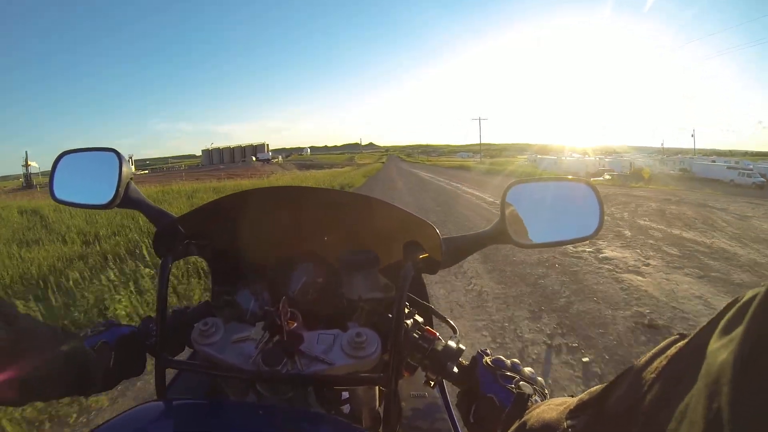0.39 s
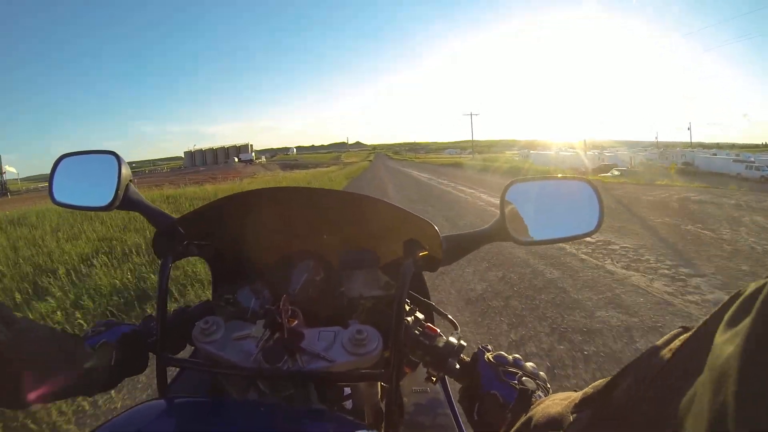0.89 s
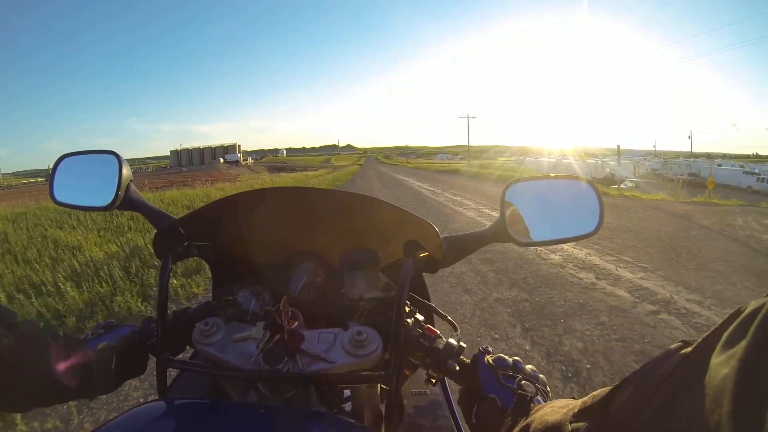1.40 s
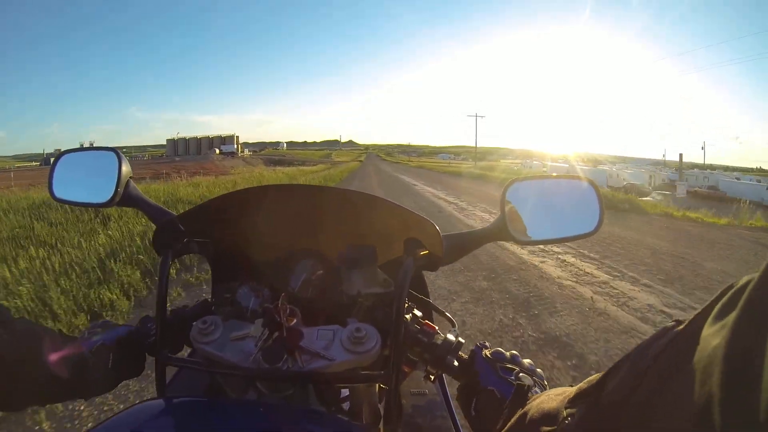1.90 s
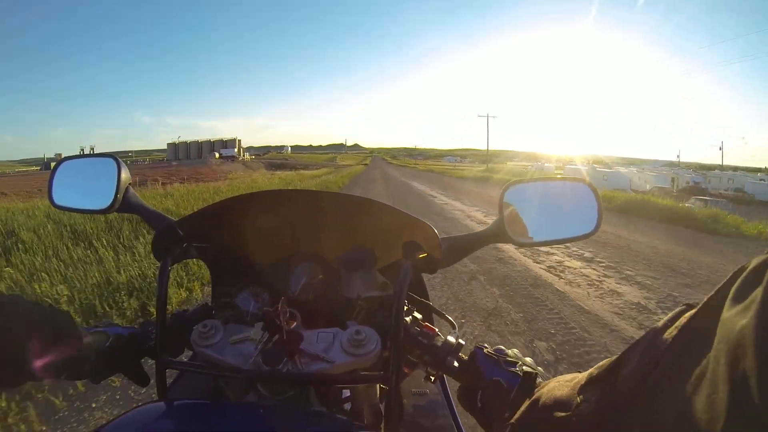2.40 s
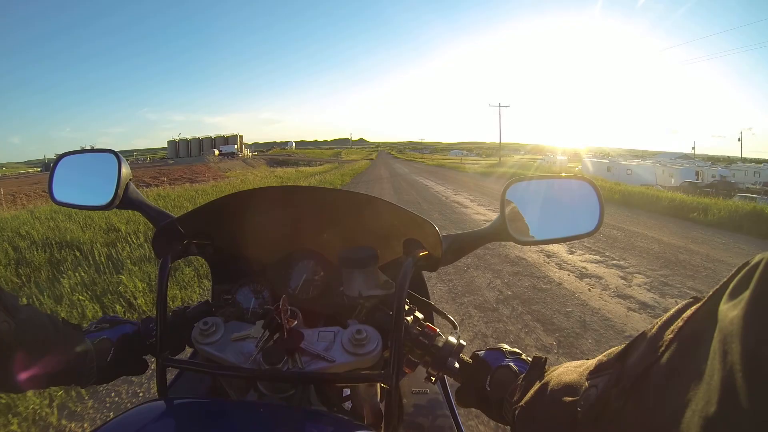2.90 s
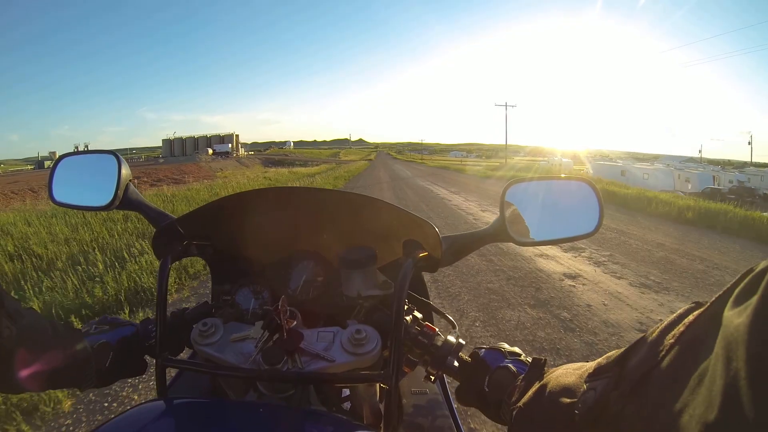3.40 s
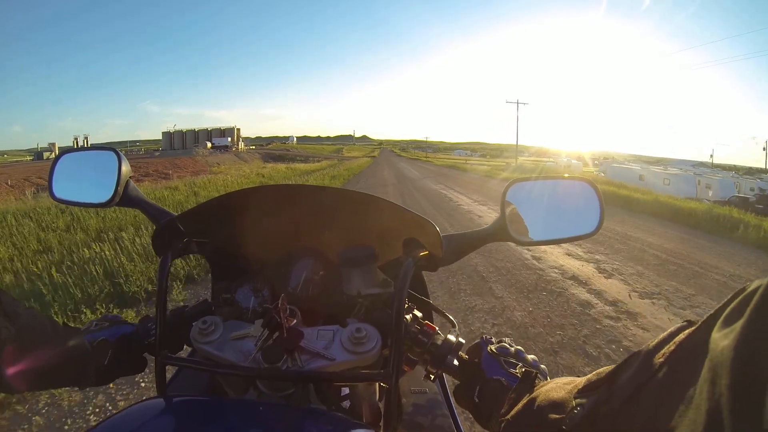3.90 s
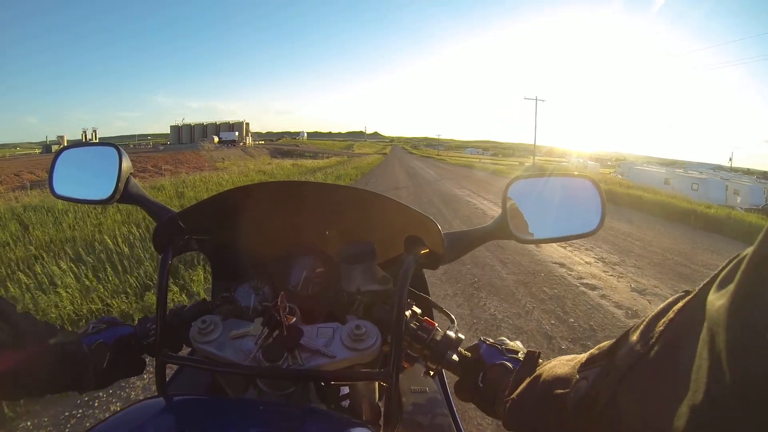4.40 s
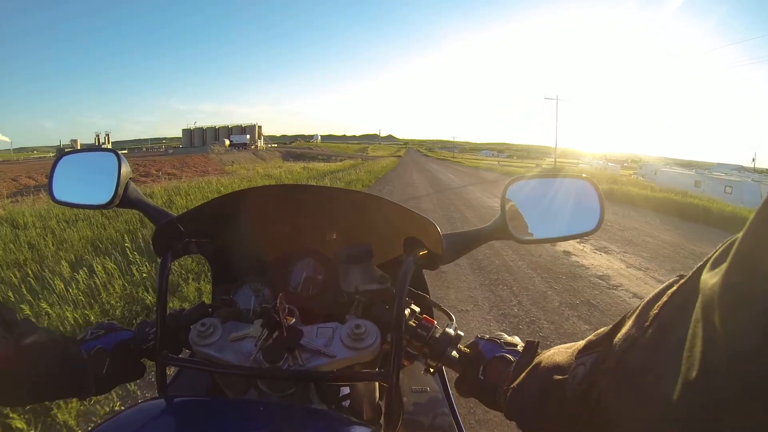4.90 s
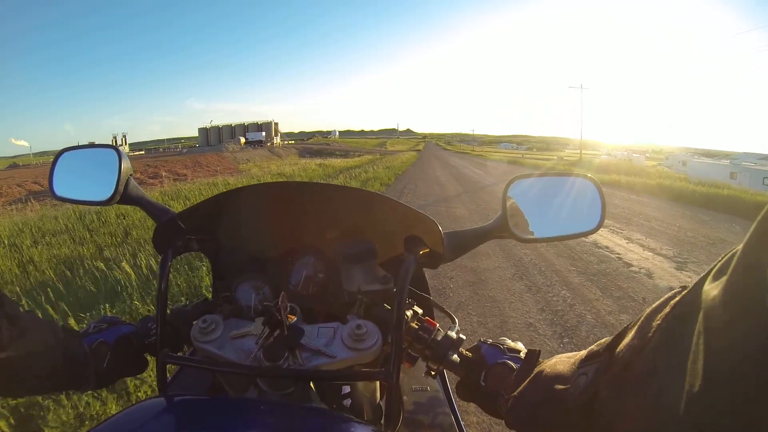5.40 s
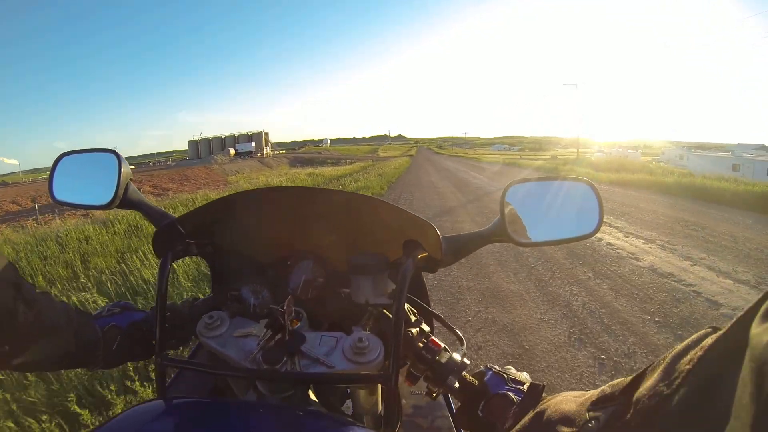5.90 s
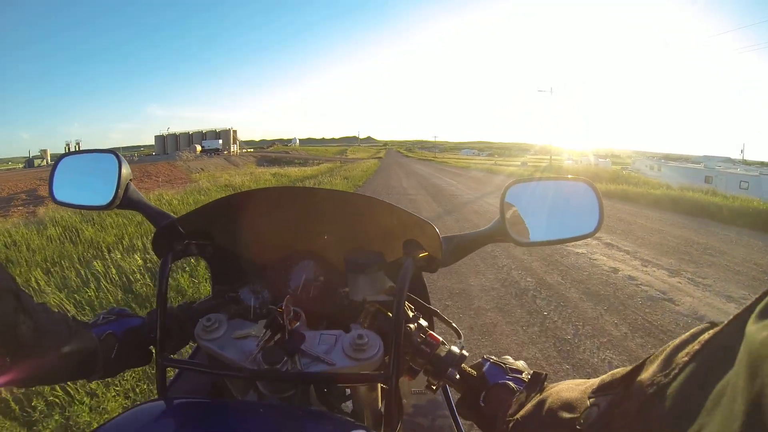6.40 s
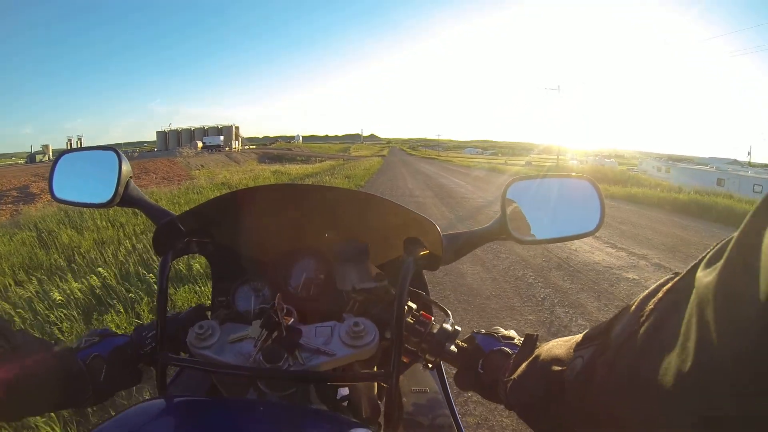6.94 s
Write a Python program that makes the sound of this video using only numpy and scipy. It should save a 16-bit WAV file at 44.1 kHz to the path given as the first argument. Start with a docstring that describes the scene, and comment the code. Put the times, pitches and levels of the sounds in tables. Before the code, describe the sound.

A motorcycle rolls slowly on gravel, its low engine hum sinking to a deep idle amid muffled wind rumble, crunching stones and a sharp late clatter.

```python
"""Motorcycle slowing on gravel

A four-cylinder motorcycle rolls slowly along a gravel road and drops to idle, heard inside a closed case on the rider.
The exhaust hums as harmonics of the firing rate; the casing whirs as filtered clatter pulsing with the firing.
Wind is filtered noise: a low rumble, with gusts of buffeting above it; tyres roar as noise roughened by clicks.
Bursts of dense treble clicks are crunching stones and a few short ticks; single stones snap or knock the frame
as struck resonances."""
import sys
import numpy as np
from scipy import signal
from scipy.fft import rfft, irfft
from scipy.io import wavfile
from scipy.ndimage import uniform_filter1d, minimum_filter1d

SR = 44100
rng = np.random.default_rng(int(sys.argv[2]) if len(sys.argv) > 2 else 0)


def file_out(sig):
    """Save sig as 16-bit WAV at sys.argv[1]."""
    # one column per channel
    cols = np.atleast_2d(sig).T
    # limit, then scale
    lim = np.clip(cols, -1, 1)
    pcm = np.round(lim * 32767).astype(np.int16)
    wavfile.write(sys.argv[1], SR, pcm)


def gain_from_db(level_db):
    """Turn a decibel level (scalar or array-like) into a linear amplitude factor."""
    decades = np.asarray(level_db, float) / 20
    return 10 ** decades


N = 310888
T = np.arange(N) / SR

# Resonances of the stones. Each row: frequency in Hz, width in Hz, relative level in dB.
STONE_BODY = [(1613, 420, 5.5), (2893, 1070, 3.5), (910, 100, 4)]
# Bright spectrum of the stones. Each row: frequency in Hz, relative level in dB.
STONE_TREBLE = [(2000, -21), (3200, 1.5), (4000, -3), (5000, -9.5), (5700, -15), (10200, -19.5),
                (11800, -24), (13200, -27.5), (15000, -32)]


def level(x, db):
    """Scale to an rms level."""
    return x * gain_from_db(db) / np.sqrt(np.mean(x ** 2))


def curves(table):
    """Columns of a time table, one value per sample."""
    s, *columns = np.transpose(table)
    return [np.interp(T, s, column) for column in columns]


def colour(x, points):
    """Causal minimum-phase filter through (Hz, dB) points, built by folding the cepstrum."""
    hz, db = np.transpose(points)
    half = 2048
    bins_hz = np.arange(half + 1) * SR / (2 * half) + 1
    log_gain = np.interp(np.log(bins_hz), np.log(hz), db) * np.log(10) / 20
    cepstrum = irfft(log_gain)
    cepstrum[1:half] *= 2
    cepstrum[half + 1:] = 0
    impulse = irfft(np.exp(rfft(cepstrum)))
    return signal.fftconvolve(x, impulse)[:N]


def ring(x, modes):
    """Sum of resonances, each (Hz, width Hz, dB)."""
    out = 0
    for hz, width_hz, db in modes:
        b, a = signal.iirpeak(hz, hz / width_hz, fs=SR)
        out = out + gain_from_db(db) * signal.lfilter(b, a, x)
    return out


def lowpass(x, hz, order):
    """Butterworth low-pass."""
    return signal.sosfilt(signal.butter(order, hz, fs=SR, output="sos"), x)


def walk(rate_hz):
    """Random levels held 1 / rate_hz seconds and slewed twice; spread near 1."""
    hold = int(SR / rate_hz)
    held = rng.standard_normal(size=1000)[np.arange(N) // hold]
    return 1.3 * uniform_filter1d(uniform_filter1d(held, hold), hold)


def swells(centre_s, db, length_ms):
    """Rms envelope of bell-shaped bursts that rise faster than they fall; length is taken at half power."""
    rise_share = 0.35  # of the length
    power = np.zeros(N)
    for t, d, w in zip(centre_s, db, length_ms):
        span = slice(max(int((t - w / 500) * SR), 0), int((t + w / 350) * SR))
        late_ms = (T[span] - t) * 1000 + (0.5 - rise_share) * w  # after the peak
        half_ms = w * np.where(late_ms < 0, rise_share, 1 - rise_share)
        power[span] += gain_from_db(2 * d) * 0.5 ** ((late_ms / half_ms) ** 2)
    return np.sqrt(power)


def grains(per_s, spread_db):
    """Random clicks, many small and a few large, at 0 dB rms."""
    hit, rank, sign = rng.random(size=(3, N))
    size = gain_from_db(-spread_db * np.log(rank + 0.0038))
    clicks = (hit < per_s / SR) * size * np.sign(sign - 0.5)
    return level(clicks, 0)


def blows(table, modes, soft_hz):
    """One click per row: the first mode rings up to the peak level, the other modes vary with the blow."""
    s, first_db, others_over_db = np.transpose(table)
    unit = np.zeros(N)
    unit[0] = 1
    out = 0
    for group, peak_db in ((modes[:1], first_db), (modes[1:], first_db + others_over_db)):
        unit_peak = np.max(lowpass(ring(unit, group), soft_hz, order=4))
        click = np.zeros(N)
        click[(s * SR).astype(int)] = gain_from_db(peak_db) / unit_peak
        out = out + lowpass(ring(click, group), soft_hz, order=4)
    return out


def engine():
    """Firing hum with harmonics and a faint gear tone; timing and strength waver slowly, over several firings."""
    # Revs sinking to idle. Each row: time in seconds, firing rate in Hz, hum level in dB.
    revs = [(0, 62.4, -24.5), (.15, 62.27, -21), (.6, 61.2, -17), (.88, 60.22, -21.5), (1.1, 59.95, -18.5),
            (1.4, 58.92, -19), (2.12, 57.8, -18), (2.62, 53.5, -20.5), (2.95, 48.15, -15),
            (3.25, 44.23, -13.5), (3.6, 43.7, -15), (3.85, 42.54, -14), (4.2, 42.92, -12),
            (4.45, 42.85, -15), (4.75, 42.4, -12), (5.0, 42.2, -9.5), (5.4, 42.5, -10), (5.9, 42.02, -10.5),
            (6.2, 42.4, -10.5), (7.05, 42.5, -9.5)]
    # Weak orders from uneven cylinders. Each row: multiple of the firing rate, level in dB relative to the hum.
    uneven = [(.5, -25), (.75, -26), (1.5, -27), (1.75, -27)]
    # Overtone level out of the exhaust. Each row: frequency in Hz, level in dB.
    overtone_pipe = [(84, -29.5), (100, -32), (118, -25.5), (127, -28.5), (145, -36), (175, -36),
                     (210, -45), (255, -43), (297, -46), (340, -55), (440, -60)]
    # Phase lags behind the hum. One value in radians for each of overtones 2 to 7.
    overtone_lags = [1.2, 3.1, 2.4, .9, 1.8, 2.5]
    lag_drift_rad = 0.55
    gear_teeth, gear_db = 25, -37  # teeth per firing; relative to the hum
    firing_hz, hum_db = curves(revs)
    pipe_hz, pipe_db = np.transpose(overtone_pipe)
    shaft = 2 * np.pi * np.cumsum(firing_hz) / SR
    phase = shaft + 0.08 * walk(13)
    hum = gain_from_db(hum_db + 0.9 * walk(12)) * np.cos(phase)
    for k, mean_lag in enumerate(overtone_lags, start=2):
        lag = mean_lag + lag_drift_rad * walk(8)
        overtone_db = np.interp(k * firing_hz, pipe_hz, pipe_db) + 3.3 * walk(8.2)
        hum += gain_from_db(overtone_db) * np.cos(k * phase - lag)
    for multiple, db in uneven:
        hum += gain_from_db(hum_db + db + 2.8 * walk(6)) * np.sin(multiple * phase)
    gear_phase = gear_teeth * shaft + 2.2 * walk(30)
    hum += gain_from_db(hum_db + gear_db + 2.5 * walk(9)) * np.sin(gear_phase)
    effort_db = hum_db - np.mean(hum_db)
    return np.sqrt(2) * hum, phase, effort_db


def whir(phase, loose_db, effort_db):
    """Valves and chain: clatter pulsing with each firing, harder under a deep hum and over loose stones."""
    # Casing spectrum. Each row: frequency in Hz, relative level in dB.
    casing_spectrum = [(900, -23), (1080, -7), (1350, -6), (1650, -2), (1910, 1), (2200, -2.5), (2500, -4),
                       (3200, -12), (3900, -17.5), (4600, -30.5), (5150, -24), (5700, -30), (9000, -39),
                       (11000, -62), (13000, -69.5), (15000, -81.5)]
    db = -38 + 0.41 * loose_db + 0.19 * effort_db
    pulse = 1 + 0.1 * np.cos(phase) + 0.11 * np.cos(phase / 2) + 0.081 * np.cos(2 * phase)
    clatter = rng.standard_normal(N) + 0.5 * grains(per_s=1500, spread_db=2)
    return gain_from_db(db + walk(14)) * level(colour(clatter * pulse, casing_spectrum), 0.19)


def wind(air_db):
    """Turbulence on the case: a low rumble, with buffeting and flutter above it that swell in gusts."""
    # Swells. Each row: centre in seconds, relative level in dB, length in ms, flutter in dB over that level.
    gusts = [(0.123, -19.5, 14, -0.5), (0.376, -20.5, 68, -6), (0.5, -25, 53, -2), (0.61, -20, 42, -4.5),
             (0.739, -21, 35, 0), (0.841, -22.5, 40, 2), (0.99, -17.5, 20, -4.5), (1.09, -26, 51, 0),
             (1.198, -17.5, 62, -8), (1.332, -19, 20, 0), (1.421, -15, 8, -7), (1.573, -18, 43, -2.5),
             (1.681, -19, 12.1, -5), (1.914, -19, 130, -11), (2.126, -18, 26, -22), (2.249, -18, 26, -0.5),
             (2.336, -11.5, 46, -1.5), (2.38, -14.5, 39, -6.5), (2.46, -18.5, 63, -7.5),
             (2.77, -23.5, 99, -10.5), (2.927, -18, 63, -14), (3.27, -24, 140, -9), (3.446, -33, 16, -13),
             (3.675, -23, 32, -2.5), (4.559, -22.5, 57, -19), (4.642, -23.5, 36, -15),
             (5.221, -19.5, 18, -18), (6.172, -26, 50.7, -2.5)]
    # Buffeting spectrum. Each row: frequency in Hz, relative level in dB.
    buffet_spectrum = [(15, -16), (25, -0.5), (60, -2.5), (118, -3.5), (160, -7.5), (220, -8.5),
                       (300, -10.5), (400, -17.5), (800, -24.5), (2000, -42), (5000, -76.5), (15000, -120)]
    # Flutter spectrum. Each row: frequency in Hz, relative level in dB.
    flutter_spectrum = [(130, -16), (190, -5), (300, 1), (420, 0.5), (560, -4), (800, -10.5), (1800, -21),
                        (4000, -42), (15000, -110)]
    eddy_fade_db_per_s, rumble_fade_db_per_s = 0.7, 0.2  # small eddies die faster as the bike slows
    flutter_per_airflow = 1.68  # dB per dB: flutter dies fast as the air slows
    s, gust_db, ms, flutter_over_db = np.transpose(gusts)
    eddy_fade_db = eddy_fade_db_per_s * T
    flow_db = -18.5 + air_db - eddy_fade_db + 2 * walk(15)
    flow = np.hypot(gain_from_db(flow_db), swells(s, gust_db, ms))
    buffet = level(colour(rng.standard_normal(N), buffet_spectrum), 3.55)
    low = lowpass(buffet, 106.5, order=2)
    # the slowest eddies follow the bike's speed, not the swells
    rumble = low * gain_from_db(-14.5 + air_db - rumble_fade_db_per_s * T + 1.13 * walk(8))
    steady_flutter = gain_from_db(-30 + flutter_per_airflow * air_db - eddy_fade_db + 1.1 * walk(11))
    flutter_flow = np.hypot(steady_flutter, swells(s, gust_db + flutter_over_db, ms))
    flutter = level(colour(rng.standard_normal(N), flutter_spectrum), 0) * flutter_flow
    return (buffet - low) * flow + rumble + flutter


def tyres(air_db):
    """Tread roaring over the loose surface, rough with small stones; fades as the bike slows."""
    # Roar spectrum. Each row: frequency in Hz, relative level in dB.
    roar_spectrum = [(250, -23), (450, -3), (800, 3), (1050, -2), (1250, -15), (2500, -28.5), (6000, -64),
                     (15000, -100)]
    fade_db_per_s = 0.82
    db = -33 + 0.12 * air_db - fade_db_per_s * T
    rough = rng.standard_normal(N) + 0.6 * grains(per_s=1200, spread_db=2)
    flicker_db = 1.4 * walk(18)
    return gain_from_db(db + flicker_db) * level(colour(rough, roar_spectrum), 0.34)


def gravel(loose_db):
    """Dense clicks, steady under the tyres and bunched in bursts with body and panel rattle."""
    # Bursts of treble clicks: stones crunching, and a few short ticks.
    # Each row: centre in seconds, relative treble level in dB, length in ms, rattle in dB over that level.
    click_bursts = [(0.08, -47.5, 8.6, -3), (0.168, -45, 33, -9), (0.377, -45, 18, -11),
                    (0.431, -42.5, 29, -2), (0.53, -43, 6, -6), (0.58, -44.5, 32, -11),
                    (0.63, -47.5, 50, -1), (0.7, -45.5, 25, -7), (0.76, -38.5, 30, 3),
                    (0.975, -54.5, 12, 6), (0.995, -40, 16, -4.5), (1.105, -45, 5, -8),
                    (1.122, -45, 16, -9), (1.172, -40, 15, -14), (1.216, -45, 26, -5), (1.31, -48.5, 60, 1),
                    (1.539, -49, 40, 2), (1.604, -42, 15, 2), (1.634, -39.5, 12.4, -19),
                    (1.819, -40.5, 9, 0), (1.861, -40.5, 18, -8), (1.926, -44, 26, -8),
                    (2.019, -42.5, 19, -12), (2.092, -50, 19, 1), (2.127, -38.5, 15.5, -11),
                    (2.208, -42.5, 11, 1), (2.286, -47.5, 22, -5), (2.526, -51, 6, -6),
                    (2.796, -50.5, 42, -2), (2.957, -47.5, 10, -5), (2.996, -63, 4.7, -8),
                    (3.144, -49.5, 5.7, -2), (3.25, -50, 12, -6), (3.405, -50, 16, 3), (3.574, -51, 19, 6),
                    (3.679, -52, 11, 6), (3.735, -59.5, 6.3, 1), (3.807, -42.5, 31, 4.5),
                    (3.865, -48, 8.4, -8), (3.936, -47, 49, 1), (4.178, -46, 27, 1), (4.218, -47, 30, 6),
                    (4.41, -62, 3.9, -4), (4.442, -62.5, 4.8, -1), (4.565, -51, 12, -4),
                    (4.605, -47.5, 12, 2), (4.682, -64, 4.9, -6), (4.882, -51, 9.2, -7),
                    (5.207, -45.5, 6.6, -4), (5.571, -41.5, 18, -1), (5.618, -35.5, 30, -4),
                    (5.663, -35, 13, -2), (5.645, -50, 13, -2), (5.685, -45, 7, 0.5), (5.706, -39, 6, 2),
                    (5.72, -36, 12, -11), (5.736, -38.5, 19, -11), (5.751, -48.5, 4.4, 0),
                    (5.772, -50.5, 24, -2), (5.799, -41.5, 26, 1), (5.853, -40.5, 14, -10),
                    (5.825, -48, 25, -3), (5.89, -50, 45, -5), (5.938, -49, 27, -6), (5.994, -47, 20, 4),
                    (6.155, -51.5, 44, 8), (6.582, -51.5, 28, -8), (6.874, -48.5, 7.9, -7),
                    (6.965, -43.5, 16, -15), (7.015, -49, 11, -3)]
    # Loose panel's modes. Each row: frequency in Hz, width in Hz, level in dB per pass.
    panel_modes = [(3148, 174, 9), (5115, 320, 0.5), (6530, 390, -10)]
    s, treble_db, ms, rattle_over_db = np.transpose(click_bursts)
    clicks = grains(per_s=7000, spread_db=4)
    rolling = gain_from_db(-53 + loose_db + 3 * walk(25))
    bursts = swells(s, treble_db, ms)
    treble = level(colour(clicks, STONE_TREBLE), -1.1) * np.hypot(rolling, bursts)
    body = level(lowpass(ring(clicks, STONE_BODY), 3380, order=4), 11) * bursts
    # ringing twice keeps the panel's modes narrow
    panel = level(ring(ring(clicks, panel_modes), panel_modes), 0)
    rattle = panel * swells(s, treble_db + rattle_over_db, ms)
    return treble + body + rattle


def frame_knocks():
    """Stones knocking the frame, which rings at its modes."""
    # Each row: time in seconds, peak of the first mode in dB, other modes in dB over it.
    knocks = [(3.7335, -28, 4), (4.05, -21, -19), (4.0545, -17.5, -12), (4.065, -33, -13),
              (4.527, -22.5, 0), (4.53, -31, 16), (4.5345, -24, 4)]
    # Frame modes. Each row: frequency in Hz, width in Hz, relative level in dB.
    frame_modes = [(737, 36, 0), (1350, 480, 23), (1750, 260, -4)]
    return blows(knocks, frame_modes, soft_hz=2200)


def stone_snaps():
    """Single stones that snap: a ringing body and a bright click at its edge."""
    # Each row: time in seconds, peak of the first mode in dB, other modes in dB over it.
    snaps = [(5.6007, -28, 7), (5.6126, -23, 5), (5.619, -24, 0), (5.628, -20, -2), (5.659, -29, 5),
             (5.668, -26, 4), (5.684, -29, 6), (5.7065, -28, 3), (5.7138, -28, 4.5), (5.7223, -15, -5),
             (5.727, -18, -13), (5.7323, -13.5, -1.5), (5.741, -13.5, -16), (5.7438, -20, -12),
             (5.7785, -29, 1), (5.789, -29, 4), (5.7985, -19.5, -1), (5.803, -26, -7), (5.8455, -22, -14),
             (5.853, -29, -9), (5.857, -21, -14)]
    s, first_db, others_over_db = np.transpose(snaps)
    edge = np.zeros(N)
    edge[(s * SR).astype(int)] = gain_from_db(first_db + others_over_db - 9)
    return colour(edge, STONE_TREBLE) + blows(snaps, STONE_BODY, soft_hz=3677)


def scene():
    """All sources, summed at one microphone; airflow drives wind and roar, loose stones shake the casing."""
    # Each row: time in seconds, airflow in dB, looseness of the stones in dB.
    ride = [(0, -9, 2), (.14, -0.5, 3.5), (.8, -1.5, 2), (1.1, -0.5, 4.5), (1.65, -2.5, -1.5),
            (2.1, -3.5, 2), (2.5, -3, -5.5), (2.9, -6, -4.5), (3.2, -3, -2.5), (3.7, -2.5, -2),
            (4.05, -1.5, -2), (4.4, -4.5, -6.5), (4.8, -6.5, -1), (5.15, -5, -1), (5.55, -4.5, -1.5),
            (5.9, -5.5, 1.5), (6.15, -4.5, 3), (6.6, -4.5, -2), (7.05, -4.5, 0.5)]
    air_db, loose_db = curves(ride)
    hum, phase, effort_db = engine()
    machine = hum + whir(phase, loose_db, effort_db)
    road = tyres(air_db) + gravel(loose_db) + frame_knocks() + stone_snaps()
    return (machine + wind(air_db) + road)[None]


def band_limit(x):
    """A steep low-pass at the top of the band."""
    return signal.sosfilt(signal.butter(12, 15100, fs=SR, output="sos"), x)


def record(dry):
    """The closed case adds its air modes; a limiter turns down the loudest swings and the very tips clip."""
    # Air modes in the case. Each row: frequency in Hz, width in Hz, level added in dB.
    case_modes = [(3220, 140, -3.5), (4870, 510, -3), (6700, 290, -7.5), (8620, 160, 0), (13300, 510, -2)]
    hold_samples = 1200
    cased = dry + ring(dry, case_modes)
    need = np.minimum(1, gain_from_db(-2.2) / (np.abs(cased) + 1e-9))
    gain = uniform_filter1d(minimum_filter1d(need, size=hold_samples), size=hold_samples)
    tip = gain_from_db(-2.6)
    mix = np.clip(cased * gain, -1.06 * tip, tip)  # the negative side clips a little later
    return band_limit(mix)


dry = scene()
out = record(dry)
file_out(out)
```